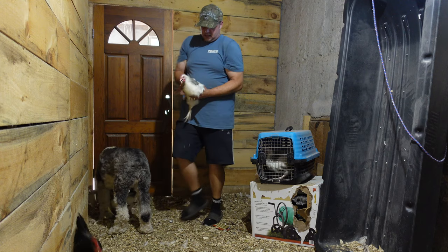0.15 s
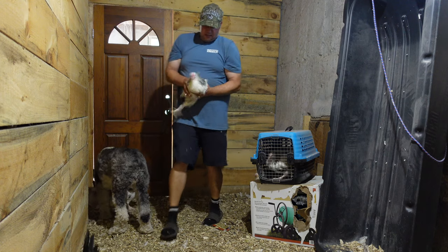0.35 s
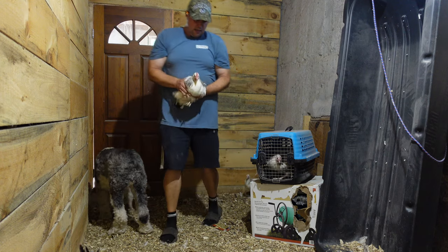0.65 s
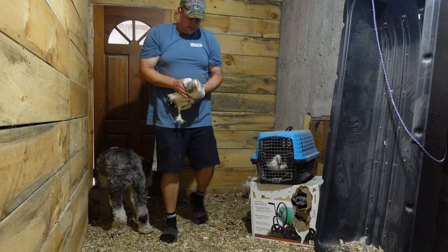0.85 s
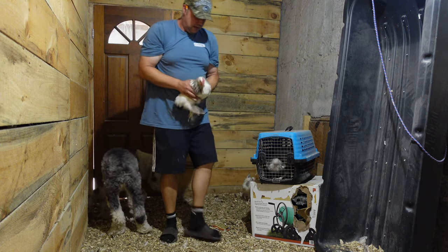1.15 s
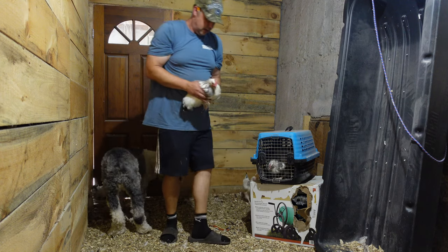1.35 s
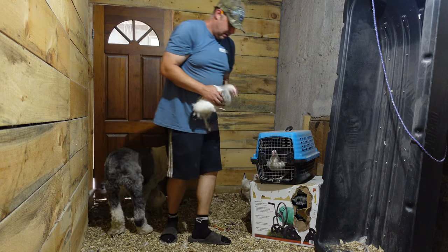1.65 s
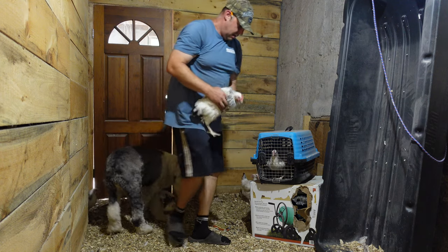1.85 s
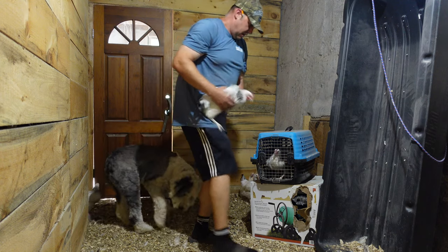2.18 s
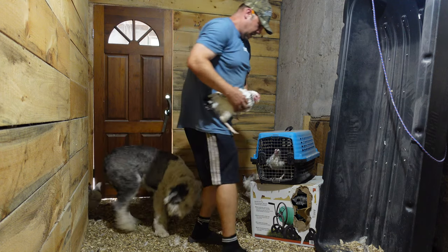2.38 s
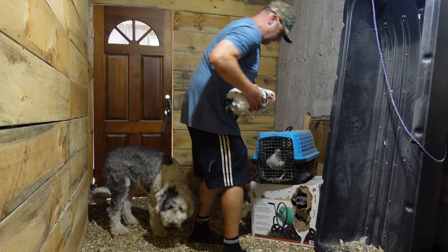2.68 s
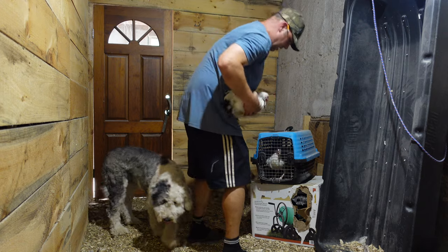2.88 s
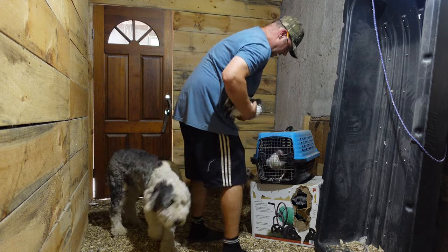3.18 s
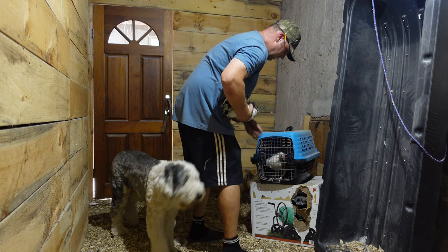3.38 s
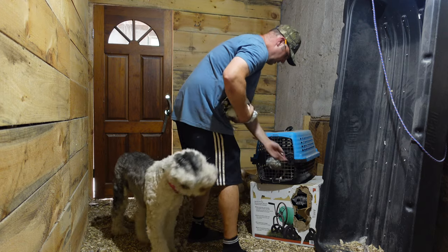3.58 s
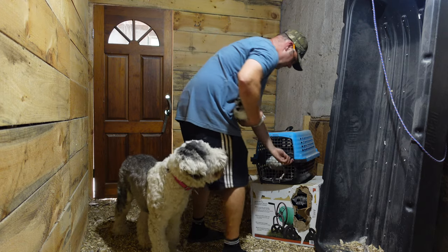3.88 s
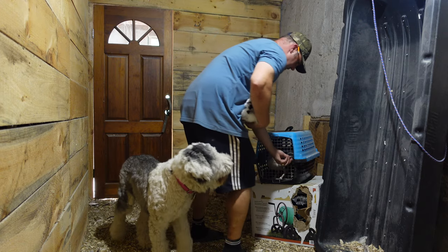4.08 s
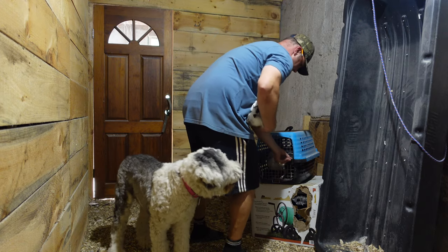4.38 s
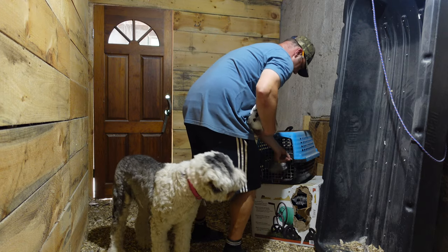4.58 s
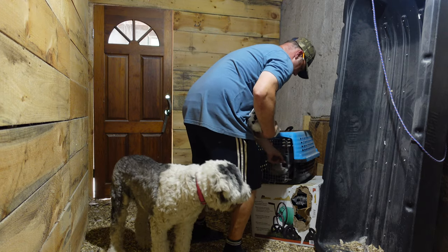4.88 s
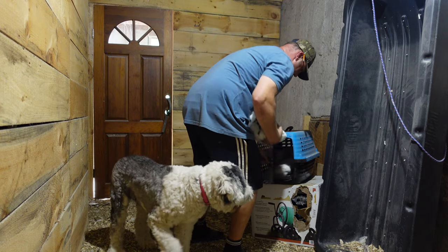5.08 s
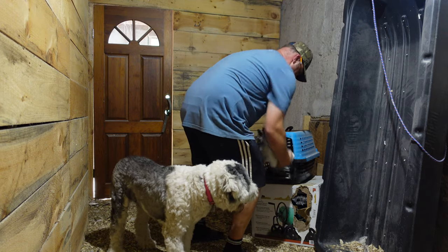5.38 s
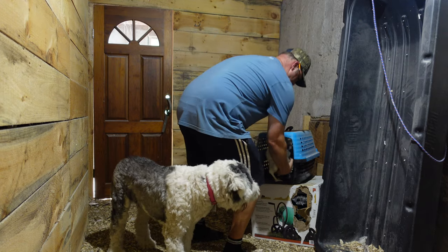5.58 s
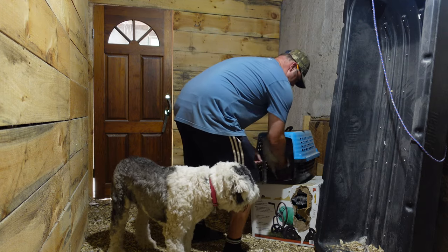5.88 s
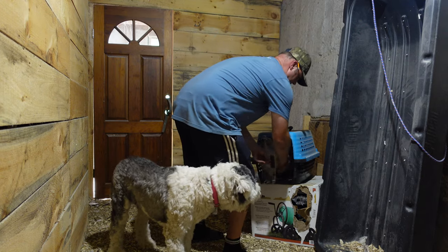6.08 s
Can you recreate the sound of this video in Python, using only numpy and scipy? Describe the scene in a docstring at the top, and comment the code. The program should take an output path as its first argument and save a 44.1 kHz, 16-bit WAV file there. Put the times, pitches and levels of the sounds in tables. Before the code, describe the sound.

Harsh chicken squawks give way to sparser clucks and soft croons while hands rustle and a hollow plastic carrier rattles, clicks and thumps.

```python
"""A young hen held in the hands squawks and clucks from the first moment in a small wooden barn room.
Body bumps thud and a few metal ticks sound early; soft croons follow, then feathers, hands and straw rustle.
Other birds peep as she is carried to a plastic carrier; ticks of its latch and wire door grow frequent.
Late bumps ring the box, the strongest near the end, between sparser clucks and murmurs.
Voices are pulses and breath through resonances; the rest is shaped noise and decaying modes."""
import sys
import numpy as np
from scipy import signal
from scipy.fft import rfft, irfft
from scipy.io import wavfile

SR = 44100
rng = np.random.default_rng(int(sys.argv[2]) if len(sys.argv) > 2 else 0)


def unload_audio(sound):
    """Save the sound as a 16-bit wav file, at the path given as the first command line argument."""
    columns = np.transpose(np.atleast_2d(sound))
    # keep every value between -1 and 1, then stretch to whole-number steps
    steps = np.round(np.clip(columns, -1, 1) * 32767)
    wavfile.write(sys.argv[1], SR, steps.astype(np.int16))


N = 275625
# Source levels below are in dB before this common gain; the air is added after it.
SOURCES_DB = -5.5


def amp(db):
    """Level law: amplitude ratio of a level in dB."""
    return 10 ** (np.asarray(db) / 20)


def evened(x):
    """Power normalisation: scales x to an rms of 1."""
    return x / np.sqrt(np.mean(x ** 2) + 1e-20)


def read(points, hz):
    """Logarithmic frequency scale: interpolates (frequency [Hz], value) points."""
    f, value = np.transpose(points)
    return np.interp(np.log(hz + 1), np.log(f + 1), value)


def colour(x, points):
    """Linear filtering: weights the spectrum of x by (frequency [Hz], gain [dB]) points."""
    gain = amp(read(points, np.fft.rfftfreq(len(x), 1 / SR)))
    return irfft(rfft(x) * gain, len(x))


def add(mix, s, sound):
    """Superposition: adds a sound at s seconds, cutting what lies outside the mix."""
    at = round(s * SR)
    part = mix[max(at, 0):][:len(sound) + min(at, 0)]
    part += sound[max(-at, 0):][:len(part)]


def wander(length, cutoff_hz):
    """Low-pass noise: a random drift of rms 1, mostly slower than the cutoff."""
    warm_up = 2000
    noise = rng.standard_normal(length + warm_up)
    b, a = signal.butter(2, 2 * cutoff_hz / SR)
    return evened(signal.lfilter(b, a, noise)[warm_up:])


def resonate(x, hz, width_hz):
    """Heterodyne resonance: shifts hz (fixed or moving) to zero, smooths, and shifts back."""
    turn = np.exp(2j * np.pi * np.cumsum(hz + 0 * x) / SR)
    r = np.exp(-np.pi * width_hz / SR)
    return 2 * (turn * signal.lfilter([1 - r], [1, -r], x / turn)).real


def resonate_twice(x, hz, width_hz, second_width_hz):
    """Cascaded resonance: two passes at one frequency steepen the skirts."""
    return resonate(resonate(x, hz, width_hz), hz, second_width_hz)


def ring(modes, spread_db):
    """Modal decay: one blow excites every mode at once, with chance strengths."""
    t = np.arange(SR // 2) / SR
    out = np.zeros(len(t))
    for (hz, db, t60), luck in zip(modes, rng.standard_normal(len(modes))):
        out += amp(db + spread_db * luck - 60 * t / t60) * np.sin(2 * np.pi * hz * t)
    return out


# spectral shape of the barn air: (frequency [Hz], relative density [dB per Hz])
AIR_SPECTRUM = [(15, -32), (25, 7.5), (140, 1.5), (233, 5), (582, 0), (1110, -1), (3170, -8), (3630, -10.5),
                (8350, -12), (15500, -26.5)]
AIR_DB = -62


def air():
    """Broadband turbulence: coloured noise, its level drifting slowly by 2.55 dB rms."""
    wash = evened(colour(rng.standard_normal(N), AIR_SPECTRUM))
    return amp(AIR_DB + 2.55 * wander(N, 0.57)) * wash


# decay of the wooden room: (frequency [Hz], t60 [s])
ROOM_DECAY = [(200, 0.41), (1400, 0.31), (4000, 0.23), (10000, 0.23)]
TAIL_DB = -1.5  # tail energy against the direct sound


def room(x):
    """Reverberation: sparse reflections of random sign, each band decaying at its own rate."""
    taps = np.zeros(SR // 2)
    at = np.arange(130, len(taps) - 20, 20)
    taps[at + rng.integers(0, 20, len(at))] = rng.choice([-1., 1.], len(at))
    hz, t, z = signal.stft(taps, SR, nperseg=256)
    decay = amp(-60 * t / read(ROOM_DECAY, hz)[:, None])
    tail = signal.istft(z * decay, SR, nperseg=256)[1]
    return x + amp(TAIL_DB) * signal.fftconvolve(x, tail / np.linalg.norm(tail))[:N]


# strokes of feathers, hands and straw:
# (peak time [s], level at the 2400 Hz band [dB], rise [s], fall [s], brightness [dB per octave])
STROKES = [(2.484, -63, .06, 0.072, 2), (2.8, -58.5, 0.068, 0.22, 1), (3.29, -58, 0.05, 0.047, 7),
           (3.391, -61, 0.035, 0.13, 5), (3.48, -68, .02, .04, 3), (3.745, -67, .02, 0.046, 6),
           (3.86, -66, .03, .06, 5), (4.06, -67, .03, .08, 5), (4.17, -57.5, 0.045, 0.26, 2.5),
           (4.358, -46, 0.033, 0.027, 2), (4.539, -59.5, 0.085, 0.13, -0.5), (4.68, -64, .02, .05, 5.5),
           (4.8, -45.5, 0.087, 0.17, 1.5), (5.0, -65, .05, 0.085, -4), (5.2, -56.5, 0.16, 0.13, -4),
           (5.47, -68, 0.018, 0.15, -4), (5.62, -55, 0.14, 0.33, -0.5), (5.84, -44.5, 0.077, 0.16, -3),
           (6.13, -65.5, 0.027, 0.097, -6.5)]
STROKE_RANGE_DB = -30  # level change over one rise or fall time


def rustle():
    """Granular friction: dense crackles of uneven size, with octave bands weighted stroke by stroke."""
    size = amp(3.3 * np.minimum(rng.exponential(1, N), 4))
    struck = rng.random(N) < 9000. / SR  # about 9000 grains per second
    grains = rng.standard_normal(N) * size * struck
    t, out = np.arange(0, N + 64, 64) / SR, np.zeros(N)
    for octave in range(-3, 3):
        hz = 2400 * 2 ** octave
        band = colour(grains, [(hz / 3, -40), (hz / 2, -12), (hz, 0), (2 * hz, -12), (3 * hz, -40)])
        level = np.zeros(len(t))
        for s, db, rise, fall, tilt in STROKES:
            distance = np.maximum((s - t) / rise, (t - s) / fall)
            level += amp(db + tilt * octave + STROKE_RANGE_DB * distance)
        top_cut = amp(-9.0 * max(octave - 1, 0))  # only the highest band is reduced
        out += evened(band) * top_cut * np.interp(np.arange(N) / SR, t, level)
    return out


# ticks of latch and wire door: (time [s], click level [dB], ring against click [dB])
TICKS = [(0.587, -33, -40), (1.143, -37.5, -40), (3.209, -45.5, -19), (3.504, -47, -23), (3.741, -45, -36),
         (3.756, -39.5, -36), (4.1644, -52, -26), (4.3517, -38, -34), (4.53, -46, -29), (4.715, -41, -21),
         (4.7921, -31, -21), (4.85, -39, -14), (5.114, -44, -34), (5.1447, -55, -29), (5.3652, -52, -30),
         (5.5643, -56, -26), (5.6341, -48, -39), (5.7583, -36, -33), (5.835, -42, -33),
         (5.9151, -25.5, -43)]
# modes of the thin wires: (frequency [Hz], level [dB], t60 [s])
WIRE = [(7250, -6, .15), (8250, -4, .25), (10970, -2, .22), (11980, 0, .25), (12680, -4, .22)]
TICK_T60 = .015  # s


def latch():
    """Impact excitation: each bright click of noise leaves thin wires ringing."""
    out, t = np.zeros(N), np.arange(SR // 40) / SR
    for s, db, ring_db in TICKS:
        click = colour(rng.standard_normal(len(t)), [(1500, 1), (7000, 4.5), (15000, -9)])
        add(out, s, amp(db - 60 * t / TICK_T60) * click)
        add(out, s, amp(db + ring_db) * ring(WIRE, 2.7))
    return out


# bumps of body, feet and carrier: (time [s], blow level [dB], slap level [dB], thud frequency [Hz])
BUMPS = [(0.004, -30, -55, 192), (0.452, -27, -45, 213), (0.808, -30.5, -40, 177), (1.416, -46, -52, 225),
         (2.298, -37, -44, 270), (3.295, -39, -60, 290), (3.535, -38.5, -54, 180), (4.214, -40.5, -41, 133),
         (4.372, -39, -37.5, 288), (4.623, -54, -39, 235), (4.72, -34, -40, 120),
         (4.788, -30.5, -32.5, 152), (4.955, -33, -40.5, 118), (5.083, -29, -38.5, 161),
         (5.137, -42, -40, 161), (5.615, -22.5, -43, 304), (5.639, -23.5, -40, 216), (5.759, -28, -29, 231),
         (5.844, -13.5, -48, 131), (5.867, -22.5, -50, 250), (5.979, -47, -39, 210)]
# modes of the hollow box: (frequency [Hz], level [dB], t60 [s])
BOX = [(236, 3.5, 0.04), (309.5, -35, 0.033), (570, -3, 0.03), (690, -8, 0.054), (898, -10.5, 0.057),
       (1080, -29, .1), (1472, -27, 0.24), (2600, -29, 0.036)]


def bumps():
    """Soft impact: a low thud and box modes carry the blow, under a short slap of noise."""
    out, t = np.zeros(N), np.arange(SR // 4) / SR
    for s, blow_db, slap_db, thud_hz in BUMPS:
        thud = evened(resonate_twice(rng.standard_normal(len(t)), thud_hz, 130.0, 130.0))
        add(out, s, amp(blow_db - 60 * t / 0.12) * thud * np.minimum(t / 0.018, 1))
        floor = np.sin(2 * np.pi * 0.53 * thud_hz * t) * np.minimum(t / 0.0091, 1)  # the floor gives
        add(out, s, amp(blow_db - 4.0 - 60 * t / 0.06) * floor)
        add(out, s, amp(blow_db - 6.) * ring(BOX, 4))
        slap = evened(colour(rng.standard_normal(len(t)), [(200, -5.5), (1200, 7.5), (4000, -2), (12000, -61)]))
        add(out, s, amp(slap_db - 60 * t / 0.17) * slap * np.minimum(t / 0.0061, 1))
    return signal.lfilter(*signal.butter(2, 2 * 69.0 / SR, "high"), out)


# falling peeps of other birds: (time [s], starting level [dB], end pitch [Hz], length [s])
PEEPS = [(2.456, -49.5, 1050, 0.072), (3.799, -51.5, 1040, 0.0744), (3.965, -49, 920, 0.101),
         (4.129, -51.5, 565, 0.094), (4.566, -52, 845, 0.088), (5.8, -36, 900, 0.065)]
PEEP_TOP_HZ = 3270


def peeps():
    """Breath-driven resonance: whistles linger high, slide down and swell toward the low end."""
    out = np.zeros(N)
    for s, db, low_hz, length in PEEPS:
        u = np.linspace(0, 1, round(length * SR))
        slide = np.cos(np.pi * np.minimum(1.2 * u, 1) / 2) ** 2
        hz = low_hz + (PEEP_TOP_HZ - low_hz) * slide
        breath = rng.standard_normal(len(u))
        main = evened(resonate_twice(breath, hz, 590.0, 580.0))
        upper = evened(resonate_twice(breath, 1.6 * hz, 900, 900))
        envelope = amp(db + 11.7 * u) * signal.windows.tukey(len(u), .3)
        add(out, s, envelope * (main + 0.22 * upper))
    return out


def membrane(hz, shake, waver_db):
    """Harmonic series: cycle count and wave of an unsteady membrane whose harmonics vary independently."""
    turns = np.cumsum(hz * (1 + shake * wander(len(hz), 116.0))) / SR
    at, knots = np.arange(len(hz)), np.arange(0, len(hz) + 900, 900)
    luck = np.clip(rng.standard_normal((29, len(knots) + 1)), -3, 1.3)
    wave = np.zeros(len(hz))
    for harmonic, (phase, *levels) in enumerate(luck, 1):
        strength = amp(waver_db * np.interp(at, knots, levels))
        wave += strength * np.cos(2 * np.pi * harmonic * turns + 3 * phase)
    return turns, evened(wave)


# throat with the beak nearly shut, and wide open: (frequency [Hz], gain [dB])
SHUT_THROAT = [(88, -46), (150, -47.5), (331, -18.5), (505, -8), (1070, 3), (1270, 0.5), (1670, 1.5),
               (2270, -15.5), (3030, -18.5), (3470, -33), (4720, -30), (6060, -39), (7350, -31),
               (15000, -54)]
OPEN_THROAT = [(120, -27), (200, -45), (613, -4), (1150, -8), (1720, -2.5), (2380, -2.5), (3730, -4),
               (5760, -16.5), (7550, -16), (12300, -31.5), (15000, -47)]


def call(rows, rough, ring_db, other=(900, -120), nostril_db=-16, rise_s=0.014):
    """Source-filter principle: membrane pulses and turbulent breath excite a throat and its resonances.

    rows: (time [s], effort [dB], pitch [Hz], beak opening, strong-weak pulsing, throat ring [Hz])
    """
    s, *columns = np.transpose(rows)
    t = np.arange(s[0], s[-1], 1 / SR)
    effort_db, hz, beak, uneven, ring_hz = (np.interp(t, s, c) for c in columns)

    turns, pulses = membrane(hz, .06 * rough, 1.5 + 5 * rough)
    # every other pulse is weaker, which adds half-pitch lines
    pulses = (pulses + 1.02) * (1 + uneven * np.cos(np.pi * turns))
    other_hz, other_db = other
    other_side = membrane(other_hz + 0 * hz, .06 * rough, 4)[1]
    pulses += amp(other_db + 4 * wander(len(t), 12)) * other_side
    throb = np.cos(2 * np.pi * 69.38 * t + 2 * wander(len(t), 26.7))
    pulses *= 1 + 1.96 * rough * throb

    breath = np.clip(rough ** 1.9 + .18 * uneven, 0, 1)
    drive = (1 - breath) * evened(pulses) + breath * rng.standard_normal(len(t))
    padded = np.pad(drive, 1024)  # silence for the filter edges
    shut = evened(colour(padded, SHUT_THROAT)[1024:-1024])
    wide = evened(colour(padded, OPEN_THROAT)[1024:-1024])

    beak = np.clip(beak, 0, 1) ** 1.5
    voice = (1 - beak) * shut + beak * wide
    voice += amp(ring_db) * resonate_twice(drive, ring_hz, 630.0, 520.0)
    nostril_hiss = resonate(resonate(drive, 6300.0, 800.), 5500.0, 800.)
    voice += amp(nostril_db) * (1 - beak) * nostril_hiss
    gape = resonate_twice(drive, 3640.0, 1600.0, 1600.0)
    voice += amp(-7.5) * beak ** 2 * gape
    edges = np.clip(np.minimum((t - s[0]) / rise_s, (s[-1] - t) / .015), 0, 1)
    return amp(effort_db) * edges * evened(voice)


# soft croons and murmurs: (start [s], length [s], effort [dB], fade [dB], pitch [Hz],
# strong-weak pulsing [0-1], throat ring [Hz], roughness [0-1])
CROONS = [(1.541, 0.073, -26.5, -21, 554.5, 0, 1100, 0.25), (2.72, .165, -40, -6.5, 460, 0, 468, 0.11),
          (3.143, 0.083, -46.5, -12, 227.8, 0.15, 640, 0.14),
          (5.272, 0.049, -39, 2.5, 462.6, .95, 2730, 0.37), (5.562, 0.077, -31, -7, 494, 0.17, 554, 0.24),
          (5.667, 0.074, -31.5, -17, 427.7, 0.6, 870, 0.38),
          (5.941, 0.078, -27.5, -23.5, 403, 1, 820, 0.27)]
CROON_BEAK, CROON_SAG = .12, .04  # opening before the curve in call; share of pitch


def croons():
    """Damped radiation: with the beak almost shut, a throat resonance dominates as the pitch sags."""
    out = np.zeros(N)
    for s, length, db, fade_db, hz, uneven, ring_hz, rough in CROONS:
        shape = CROON_BEAK, uneven, ring_hz
        rows = [(s, db, hz, *shape),
                (s + length, db + fade_db, hz * (1 - CROON_SAG), *shape)]
        add(out, s, call(rows, np.clip(rough, 0, 1), ring_db=15))
    return out


# clucks: (start [s], length [s], effort at the pitch peak [dB], onset against it [dB],
# end against it [dB], peak pitch [Hz], beak opening before the curve in call [0-1],
# strong-weak pulsing [0-1], throat ring [Hz], nostril hiss [dB])
CLUCKS = [(0.278, 0.098, -19, -3.5, -5.5, 542.4, 0.8, 0.42, 1020, -14),
          (0.52, 0.046, -18, -0.5, -22, 531, 0.87, 0.85, 1080, -16),
          (0.663, 0.098, -17, 7.5, -7.5, 551, 0.67, 0.16, 1190, -10),
          (0.983, 0.062, -18.5, 2, -5, 552, .6, 0.27, 1110, -19),
          (1.193, 0.055, -15.5, 1, -12.5, 527.4, 0.59, 0.23, 1410, -14),
          (1.737, 0.0665, -17.5, -4, -9, 512.4, 0.55, 0.33, 1460, -14),
          (2.218, 0.084, -21.5, -13, 0, 529.2, 0.37, 0.1, 1210, -2),
          (2.593, 0.065, -17, 1.5, -9, 570.7, .3, 0.4, 1290, -9),
          (2.914, 0.059, -21, -2.5, -11.5, 522.2, 0.29, 1, 1090, 2),
          (3.29, 0.074, -22.5, -11, -9, 532.7, 0.25, .9, 1450, -1.5),
          (5.222, 0.046, -25, -1.5, -7, 495.6, 0.39, 0.57, 1210, -14),
          (5.45, 0.061, -21, 5, -19.5, 534.5, 0.09, 0.25, 1060, -33),
          (6.105, 0.064, -34, 2, -11.5, 521, 0.3, .7, 1250, -24)]
CLUCK_ROUGH, CLUCK_RISE_S = .43, 0.017
SCOOP, SAG = 0.0418, 0.0605  # pitch deficit at the start and at the end, as shares of the peak


def clucks():
    """Pitch gesture: membrane pitch scoops quickly to a peak, then pitch sags while the effort slides."""
    out = np.zeros(N)
    for s, length, db, onset_db, fade_db, hz, beak, uneven, ring_hz, nostril_db in CLUCKS:
        shape = beak, uneven, ring_hz
        rows = [(s, db + onset_db, hz * (1 - SCOOP), *shape),
                (s + CLUCK_RISE_S, db, hz, *shape),
                (s + length, db + fade_db, hz * (1 - SAG), *shape)]
        add(out, s, call(rows, CLUCK_ROUGH, ring_db=9.3, nostril_db=nostril_db))
    return out


# squawk syllables: (start [s], length [s], mid effort [dB], effort change [dB], start pitch [Hz],
# end pitch [Hz], mid beak opening before the curve in call [0-1], start throat ring [Hz],
# end throat ring [Hz], pitch of the other side of the voice box [Hz], its level against the main side [dB])
SQUAWKS = [(-0.02, .11, -22, -2, 642.5, 684.5, 0.7, 2320, 2700, 843, -7),
           (0.083, 0.096, -17, -2.5, 631, 669.7, 0.88, 2560, 2380, 801, 0),
           (0.388, 0.055, -18, -11, 702, 669.5, 0.99, 2420, 2700, 908, -2),
           (0.43, 0.073, -16, 0, 687, 670.4, 1, 2840, 2770, 905, -3),
           (0.757, 0.14, -17, 1, 689.3, 624, 0.87, 2530, 1950, 924, -0.5),
           (1.268, 0.082, -20, -5, 633.4, 664, 0.87, 2360, 2310, 868, 2),
           (1.33, 0.16, -18, -3.5, 637, 607, 0.79, 1950, 2120, 882.4, -4),
           (1.832, .066, -23.5, -4, 635, 719, 0.77, 1900, 2050, 897, -1),
           (1.888, 0.12, -17, -2, 625.5, 622, 0.93, 1870, 2320, 896, -4.5),
           (1.982, 0.11, -14.5, -1.5, 592.5, 568.2, 1, 2330, 2350, 896, -10)]
SQUAWK_ROUGH, SQUAWK_UNEVEN = .48, 0.35
GAPE_PER_KHZ = 0.43  # the beak opens as the throat ring climbs


def squawks():
    """Two-source phonation: both sides of the voice box sound while effort, pitch and throat slide."""
    out = np.zeros(N)
    for s, length, db, swell_db, hz, end_hz, beak, ring_hz, end_ring_hz, *other in SQUAWKS:
        rows = []
        for u in (0, .5, 1):
            climb_hz = end_ring_hz - ring_hz
            gape = beak + GAPE_PER_KHZ * (u - .5) * climb_hz / 1000
            rows.append((s + u * length, db + swell_db * (u - .5), hz + u * (end_hz - hz),
                         gape, SQUAWK_UNEVEN, ring_hz + u * climb_hz))
        add(out, s, call(rows, SQUAWK_ROUGH, ring_db=5.7, other=other, rise_s=0.024))
    return out


def hen():
    """Superposition of calls: the held bird's croons, clucks and squawks, high-passed at 170 Hz."""
    high_pass = signal.butter(4, 170, "high", fs=SR, output="sos")
    return signal.sosfilt(high_pass, croons() + clucks() + squawks())


def scene():
    """Linear superposition: the sources share the room's reverberation, and the air is added dry."""
    sources = rustle() + latch() + bumps() + peeps() + hen()
    return (room(amp(SOURCES_DB) * sources) + air())[None]


def record(dry):
    """Band limitation: a linear-phase low-pass removes the range above 15770 Hz."""
    low_pass = signal.firwin(511, 15770, window=("kaiser", 9), fs=SR)
    return signal.oaconvolve(dry, low_pass[None], "same")


dry = scene()
out = record(dry)
unload_audio(out)
```